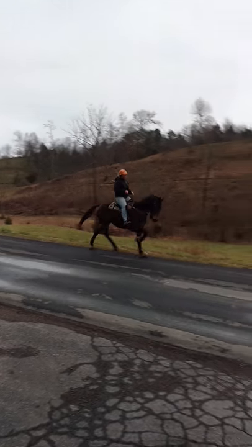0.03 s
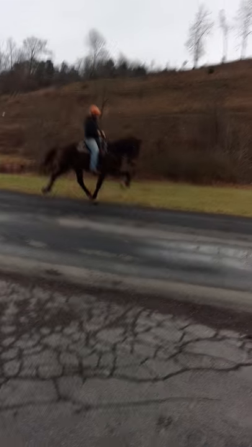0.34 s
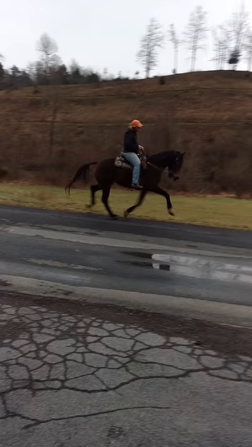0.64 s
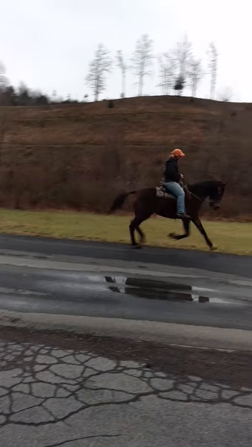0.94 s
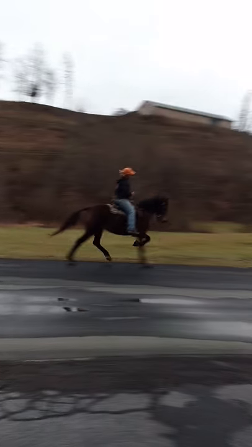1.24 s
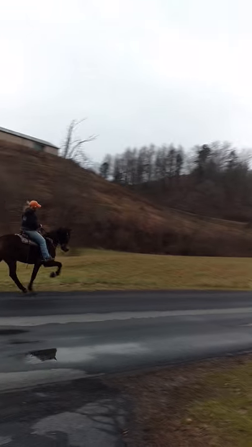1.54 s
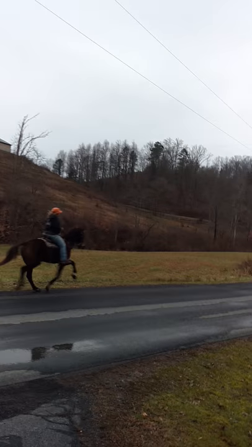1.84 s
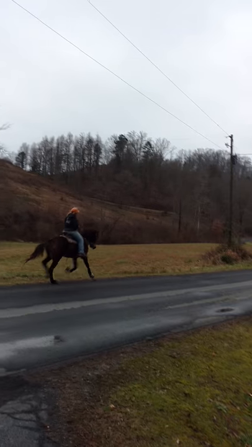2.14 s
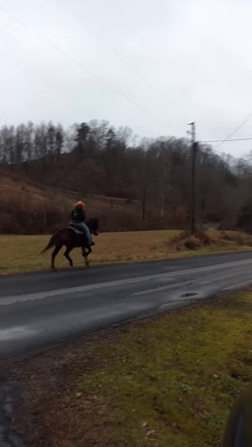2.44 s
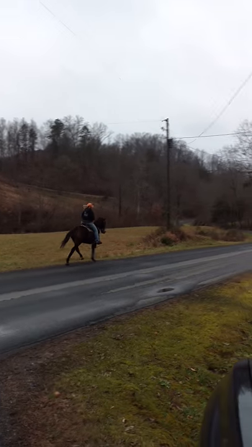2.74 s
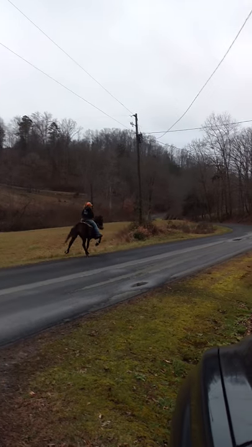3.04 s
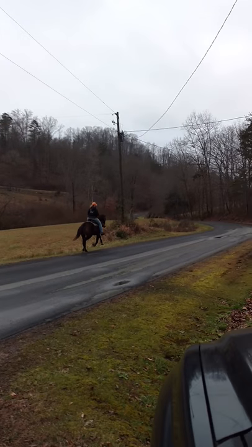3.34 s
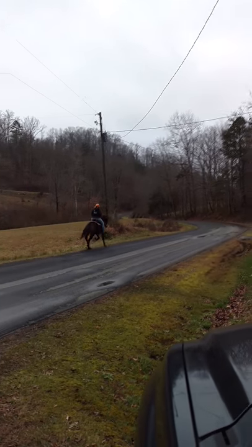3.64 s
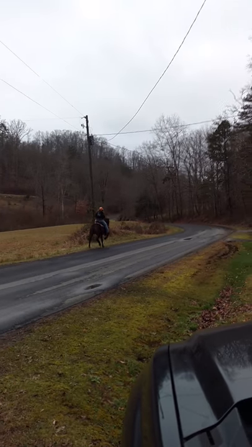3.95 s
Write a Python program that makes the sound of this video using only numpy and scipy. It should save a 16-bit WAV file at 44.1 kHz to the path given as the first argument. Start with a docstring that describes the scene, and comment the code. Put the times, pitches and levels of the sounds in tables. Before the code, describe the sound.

A horse passes at a brisk pace, its hooves clopping on wet asphalt.

```python
"""A horse passes left to right at a quick four-beat gait on wet asphalt in open country.
Each hoof touches, then slaps flat about 10 ms later: a knock, the ring of the hollow under the sole,
a low thud and a spray of water and grit. Hooves scuff, drops fall back, the bridle jingles faintly.
The hillside returns a faint tail over a quiet hush; a low rumble grows at the end."""
import sys
import numpy as np
from scipy import signal
from scipy.fft import rfft, irfft
from scipy.io import wavfile

SR = 44100
rng = np.random.default_rng(int(sys.argv[2]) if len(sys.argv) > 2 else 0)


def wrap_up_sound(samples):
    """Save the sound to the file named by the first command line argument, as 16-bit audio."""
    columns = np.atleast_2d(samples).T
    # keep every value between -1 and 1, then stretch to whole-number steps
    tamed = np.clip(columns, -1, 1)
    steps = np.round(tamed * 32767).astype(np.int16)
    wavfile.write(sys.argv[1], SR, steps)


N = 176400
HIT_SIZE = 4096
T = np.arange(HIT_SIZE) / SR
HIT_GAIN = np.sqrt(0.01 * SR)  # energy 1 -> RMS 1 over 10 ms
PASS_S = 1.2  # horse crosses from left to right


def amp(db):
    """dB to gain."""
    return 10 ** (np.asarray(db) / 20)


def unit(x):
    """Scale to energy 1."""
    return x / np.sqrt(np.sum(x ** 2) + 1e-20)


def at_hz(points, hz):
    """Interpolate a table over log frequency."""
    f, value = np.transpose(points)
    return np.interp(np.log(hz + 1), np.log(f), value)


def over_time(points):
    """Interpolate a table over the scene's samples."""
    return np.interp(np.arange(N) / SR, *np.transpose(points))


def fade(t60_s, t=T):
    """Exponential decay."""
    return np.exp(-np.log(1000) * t / t60_s)


def add(mix, start_s, sound):
    """Mix a sound in at start_s."""
    part = mix[max(round(start_s * SR), 0):][:len(sound)]
    part += sound[:len(part)]


def click(spectrum, shift=1, tilt_db_oct=0, pivot_hz=4400):
    """Minimum-phase pulse of a spectrum, pitch-shifted, tilted within an octave of the pivot."""
    hz = abs(np.fft.fftfreq(HIT_SIZE, 1 / SR))
    tilt_db = tilt_db_oct * np.log2(np.clip(hz / pivot_hz, .5, 2))
    log_gain = np.log(amp(at_hz(spectrum, hz / shift) + tilt_db))
    return unit(np.fft.ifft(np.exp(np.conj(signal.hilbert(log_gain)))).real)


def wavering_noise(spectrum, level, waver_db):
    """Coloured noise on both sides, drifting about a level curve."""
    colour = amp(at_hz(spectrum, np.fft.rfftfreq(N, 1 / SR)))
    noise = irfft(rfft(rng.standard_normal((2, N))) * colour, N)
    drift = np.interp(np.arange(N), np.linspace(0, N, 60), rng.standard_normal(60))
    return np.sqrt(N) * unit(noise) * amp(over_time(level) + waver_db * drift)


def air():
    """Outdoor hush, a late-growing rumble and a soft low flutter of the air."""
    # noise spectra: f/Hz, density/dB
    hush = [(25, -17), (60, -17), (130, 4), (220, -3), (400, -4.5), (700, 0.5), (1050, 4), (1600, -0.5),
            (2500, -8.5), (4000, -11.5), (7000, -18.5), (11000, -28.5), (15000, -42), (16400, -49)]
    rumble = [(20, -33), (40, -11), (54, 14.5), (70, -11), (110, -3), (200, -23), (400, -16), (1500, -57)]
    flutter = [(30, -13), (90, -2), (150, 1.5), (250, -3.5), (450, -10), (1200, -29.5)]
    # envelopes: t/s, level/dB
    hush_level = [(0, -47.5), (.7, -52), (1.5, -53.5), (2.2, -57), (2.9, -53), (3.4, -48.5), (4, -47)]
    rumble_level = [(0, -65), (2.6, -74), (3.2, -56), (3.6, -48), (4, -40)]
    flutter_level = [(0, -59), (.7, -56.5), (.95, -59.5), (1.3, -54.5), (1.5, -65), (2.6, -59.5),
                     (3.05, -61), (3.3, -54.5), (3.75, -52), (4, -71)]
    return (wavering_noise(hush, hush_level, waver_db=1.2)
            + wavering_noise(rumble, rumble_level, waver_db=2)
            + wavering_noise(flutter, flutter_level, waver_db=3))


def hillside(x, far_db=-29.5, near_db=-12.5, near_t60_s=0.058):
    """Quick scatter off the ground, faint long tail from slope and trees."""
    # tail decay: f/Hz, t60/s
    tail = [(100, 0.6), (500, 1), (1100, 0.4), (3000, 0.59), (8000, 0.41), (16000, 0.24)]
    t = np.arange(SR) / SR
    hz, frame_s, bands = signal.stft(rng.standard_normal((2, SR)), SR, nperseg=256)
    bands = bands * fade(at_hz(tail, hz)[:, None], frame_s)
    far = signal.istft(bands, SR, nperseg=256)[1][:, :SR] * (1 - np.exp(-t / 0.005))
    near = rng.standard_normal((2, SR)) * fade(near_t60_s, t) * (1 - np.exp(-t / 0.0019))
    response = amp(far_db) * unit(far) + amp(near_db) * unit(near)
    return signal.fftconvolve(x[None], response, axes=1)[:, :N]


def drops(rate_per_s=140, level_db=-68, spread_db=7):
    """Thrown water and grit tick back onto the road."""
    # tick spectrum: f/Hz, level/dB
    tick = [(500, -12), (1500, 3), (3800, 2), (7000, -1.5), (10000, -5.5), (14000, -16), (16400, -32)]
    sizes = amp(spread_db * np.minimum(rng.exponential(1, (2, N)), 3))
    lands = rng.random((2, N)) < rate_per_s / SR / 2
    patter = signal.fftconvolve(sizes * lands, click(tick)[None], axes=1)[:, :N]
    return amp(level_db) * np.sqrt(N) * unit(patter)


def bridle(ring_t60_s=0.03, shake_t60_s=0.22):
    """Small metal parts shiver and ring."""
    # jingles: t/s, level/dB
    jingles = [(0.241, -54), (.79, -62), (1.14, -60), (1.33, -60), (1.78, -64)]
    # metal modes: f/Hz, level/dB
    modes = [(13660, 2), (13890, 6), (14850, -2), (15100, -3)]
    out = np.zeros((2, N))
    t = np.arange(SR // 4) / SR
    ring = sum(amp(db) * np.sin(2 * np.pi * hz * T) for hz, db in modes) * fade(ring_t60_s)
    for start_s, db in jingles:
        shake = rng.standard_normal(len(t)) * fade(shake_t60_s, t)
        jingle = unit(signal.fftconvolve(shake, ring))
        add(out[int(start_s > PASS_S)], start_s, amp(db) * HIT_GAIN * jingle)
    return out


def grains(pulse, t60_s, spread_db=4.5, rise_s=0.0005):
    """Dying shower of uneven tiny clicks, coloured by a pulse."""
    sizes = amp(spread_db * np.minimum(rng.exponential(1, HIT_SIZE), 5))
    shower = rng.standard_normal(HIT_SIZE) * sizes * fade(t60_s) * (1 - np.exp(-T / rise_s))
    return unit(signal.fftconvolve(shower, pulse)[:HIT_SIZE])


def contact(pulses, clop_db, ring_hz, ring_t60_s, ring_db, thud_db, spray_db, grain_stretch):
    """Hoof meets road: knock, hollow ring, grit crushed under the shoe, thud, spray."""
    knock, thud, spray = pulses
    hollow = unit(np.sin(2 * np.pi * ring_hz * T) * fade(ring_t60_s))
    clop = unit(knock + amp(ring_db) * hollow)
    crunch_db = -2 - 0.67 * ring_db  # a flat landing cups the air: more ring, less crunch
    clop = unit(clop + amp(crunch_db) * grains(knock, 0.034 * grain_stretch))
    low = unit(thud + amp(5.5) * grains(thud, 0.055 * grain_stretch))
    wet = unit(amp(-1.5) * spray + grains(spray, 0.04 * grain_stretch))
    return -HIT_GAIN * (amp(clop_db) * clop + amp(thud_db) * low + amp(spray_db) * wet)


def hooves(knock_ref_hz=1035, thud_ref_hz=317, touch_stretch=0.57):
    """Brief touch and flat slap per footfall, light scuffs on lift-off. Rows: left, right."""
    # footfalls: slap t/s, clop/dB, ring f/Hz, ring t60/s, ring re knock/dB, thud/dB, thud f/Hz,
    # spray/dB, spray tilt/(dB/oct), touch lead/ms, touch/dB, touch spray/dB
    steps = [(0.0521, -19.5, 1190, 0.0035, 0.5, -30, 280.0, -34.5, 0, 10, -28, -32),
             (0.1441, -20, 727, 0.026, 4.5, -50, 260.0, -33.5, 0.5, 6.2, -28.5, -45),
             (0.2796, -18.5, 1040, 0.02, -3, -39.5, 310.0, -25, -2, 12, -35.5, -34.5),
             (0.3778, -21, 1470, 0.019, 9, -41, 290.0, -39.5, -5.5, 8, -26, -63),
             (0.5299, -21.5, 1170, 0.014, -3, -30, 250, -34.5, 4, 10, -37.5, -47.5),
             (0.6338, -23, 710, 0.013, -0.5, -41, 215, -37, 1, 12.5, -28.5, -40),
             (0.7613, -16.5, 1310, 0.0098, 4, -58, 274, -33.5, 4, 9.8, -31, -37),
             (0.873, -24.5, 1380, 0.017, 8, -37, 240, -38.5, 2.5, 6.6, -24.5, -48),
             (1.0113, -21, 1010, 0.014, 11.5, -31.5, 357, -28, 5, 9, -31.5, -40),
             (1.1135, -20, 850, 0.016, 4, -39, 300, -31, -0.5, 10.6, -30.5, -41),
             (1.2499, -19, 1087, 0.044, 2.5, -54, 315, -27, 2, 9.3, -37, -38.5),
             (1.3597, -23, 1200, 0.0056, 4.5, -38.5, 320, -36, -2, 8.7, -34.5, -35),
             (1.486, -15, 1168, 0.023, 8.5, -38.5, 390, -30, 1, 11.5, -52, -39),
             (1.605, -31.5, 1070, 0.0062, -7, -42.5, 278, -45, 0, 7.6, -37.5, -52),
             (1.739, -19.5, 1040, 0.021, 4, -30.5, 367, -30, 5, 12, -41, -49),
             (1.856, -28, 814, 0.0054, -2, -33, 365, -39.5, -2.5, 9.1, -35, -44),
             (1.978, -21, 1102, 0.037, 9.5, -39, 412, -23, -5, 12, -43.5, -47),
             (2.104, -31, 760, 0.016, 3.5, -39.5, 370.0, -42, -6.5, 9.2, -38, -53),
             (2.2418, -20, 1122, 0.044, 3.5, -39, 353, -28.5, -0.5, 10.7, -41.5, -49),
             (2.345, -30.5, 780, 0.007, 2.5, -39, 420, -39, -4, 10.4, -40, -49),
             (2.4943, -22, 1090, 0.008, -3.5, -33, 397, -33.5, -1, 8.9, -42, -39.5),
             (2.6006, -27, 830, 0.021, 4, -44, 380.0, -45.5, -2.5, 7.8, -37.5, -45.5),
             (2.7412, -19.5, 1116, 0.024, 7.5, -39.5, 395, -28, 2, 11.5, -39, -42.5),
             (2.8565, -32, 965, 0.028, 10, -44.5, 257, -39.5, -1.5, 11.3, -36.5, -38.5),
             (2.9992, -18.5, 1112, 0.018, 11, -42, 292, -30.5, 1, 6.9, -39, -39.5),
             (3.1242, -36.5, 760, 0.03, 9, -43, 314, -34.5, -6, 7.6, -30, -36.5),
             (3.2572, -23.5, 1130, 0.026, 3.5, -42.5, 320.0, -31.5, 4.5, 8.7, -35.5, -35.5),
             (3.3382, -22.5, 917, 0.014, -2.5, -44, 377, -32, -3.5, 11, -32.5, -49),
             (3.4906, -28.5, 833, 0.042, -8, -37.5, 300.0, -30, 0, 5, -38.5, -38.5),
             (3.6, -25, 815, 0.028, 8, -31.5, 280, -41.5, -2, 12.1, -24.5, -36.5),
             (3.737, -22, 1520, 0.0075, 0, -33, 368, -26, 7.5, 7.2, -28.5, -42),
             (3.8431, -23.5, 810, 0.011, -1.5, -42, 376, -43, 5, 10.3, -28.5, -34),
             (3.9955, -17, 826, 0.017, 4, -33, 410, -30, 1.5, 8.8, -34, -34.5)]
    # scuffs: t/s, clop/dB, grit/dB
    scuffs = [(0.442, -57, -61), (0.827, -48, -60), (0.903, -69, -66), (1.063, -48, -59), (1.083, -45, -50),
              (1.177, -41, -46.5), (1.399, -53, -51.5), (1.535, -51, -55), (1.904, -54, -54),
              (2.132, -50, -57), (2.458, -51, -54.5), (2.646, -40.5, -52), (2.925, -41, -47),
              (3.153, -44.5, -51), (3.321, -35, -39), (3.434, -38.5, -41.5), (3.639, -31.5, -47),
              (3.813, -43, -35), (3.904, -51, -48)]
    # contact spectra before pitch shift: f/Hz, level/dB
    knock = [(100, -67.5), (350, -11.5), (600, -6), (900, 3), (1300, 3.5), (1700, -1.5), (2200, -5.5),
             (3000, -45.5), (6000, -23), (16000, -92.5)]
    thud = [(30, -42.5), (80, -23.5), (130, -3), (200, 0), (320, 0.5), (480, -0.5), (800, -7), (2000, -39)]
    spray = [(300, -59), (1500, -35.5), (2500, 2.5), (3800, 3.5), (5500, -2.5), (7500, -7.5), (9500, -10.5),
             (12000, -19), (15000, -27), (16400, -49)]
    out = np.zeros((2, N))
    for (slap_s, clop_db, ring_hz, ring_t60_s, ring_db, thud_db, thud_hz,
         spray_db, tilt_db_oct, lead_ms, touch_db, touch_spray_db) in steps:
        pulses = (click(knock, shift=(ring_hz / knock_ref_hz) ** 0.37),
                  click(thud, shift=thud_hz / thud_ref_hz),
                  click(spray, shift=0.93, tilt_db_oct=tilt_db_oct))
        slap = contact(pulses, clop_db, ring_hz, ring_t60_s, ring_db, thud_db, spray_db,
                       grain_stretch=0.86)
        touch = contact(pulses, touch_db, ring_hz, ring_t60_s * touch_stretch, ring_db=-2,
                        thud_db=touch_db - 12, spray_db=touch_spray_db, grain_stretch=touch_stretch)
        side = out[int(slap_s > PASS_S)]
        add(side, slap_s, slap)
        add(side, slap_s - lead_ms / 1000, touch)
    pulses = click(knock), click(thud), click(spray, shift=0.96, tilt_db_oct=2)
    for start_s, clop_db, grit_db in scuffs:
        scuff = contact(pulses, clop_db, ring_hz=950, ring_t60_s=0.034, ring_db=-6,
                        thud_db=clop_db - 11, spray_db=grit_db, grain_stretch=0.76)
        add(out[int(start_s > PASS_S)], start_s, scuff)
    return out


def microphones(x, mono_hz=1300, cycle_hz=2600, shadow_db=2.42, bass_hz=100):
    """Stereo pair: mids stay central, treble reaches the nearer side first, deep bass swings towards opposite
    phase between the sides."""
    # right minus left: f/Hz, level/dB
    imbalance = [(200, 1.17), (2000, 1.17), (4500, -1), (12000, -1.5)]
    size = N + N // 8
    hz = np.fft.rfftfreq(size, 1 / SR)
    treble_rad = 2 * np.pi * np.maximum(hz - mono_hz, 0) / cycle_hz
    bass_rad = 3.4 / (1 + (hz / bass_hz) ** 2) ** 0.57
    phase_rad = treble_rad - .35 * np.sin(2 * treble_rad) - bass_rad
    near = np.exp(.5j * phase_rad) * amp(shadow_db * np.minimum(treble_rad / np.pi, 1))
    balance = amp(at_hz(imbalance, hz) / 2)
    from_left, from_right = rfft(x, size)
    left = (from_left * near + from_right / near) / balance
    right = (from_left / near + from_right * near) * balance
    return irfft(np.array([left, right]), size)[:, :N]


def scene():
    """Horse and surroundings at the microphones, with a slow drift in balance."""
    # left minus right: t/s, level/dB
    pan = [(0, -1), (1.2, -0.5), (2.2, 0.1), (4, 1.4)]
    horse = hooves()
    background = air()
    mix = horse + hillside(horse.sum(0)) + drops() + bridle() + background
    pan_db = over_time(pan)
    return microphones(mix) * amp(np.array([pan_db, -pan_db]) / 2)


def record(dry, cutoff_hz=16400):
    """Clip at full scale, then low-pass."""
    lowpass = signal.firwin(511, cutoff_hz, window=("kaiser", 9), fs=SR)
    return signal.oaconvolve(np.clip(dry, -1, 1), lowpass[None], "same")


dry = scene()
out = record(dry)
wrap_up_sound(out)
```